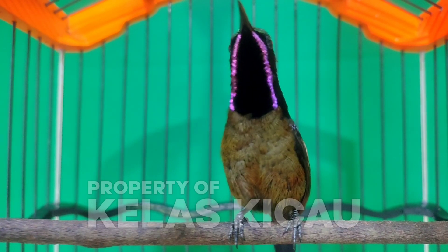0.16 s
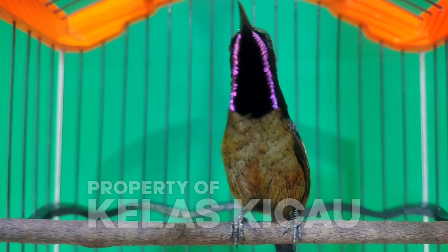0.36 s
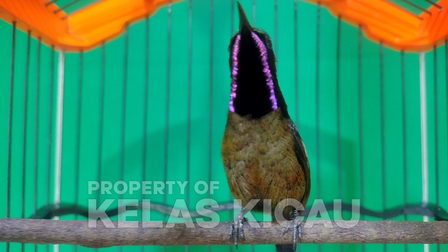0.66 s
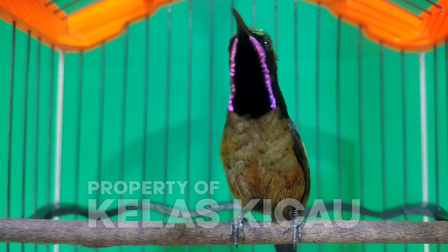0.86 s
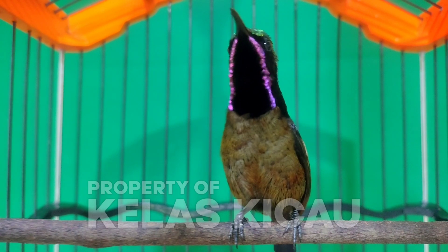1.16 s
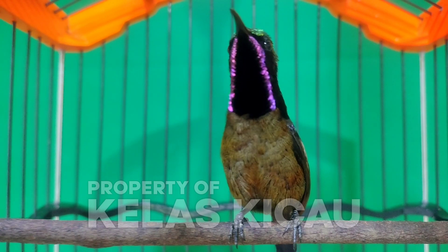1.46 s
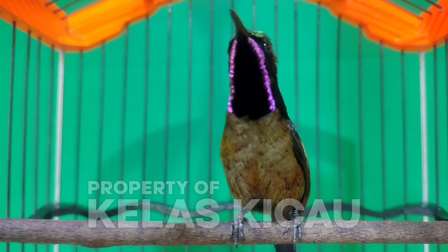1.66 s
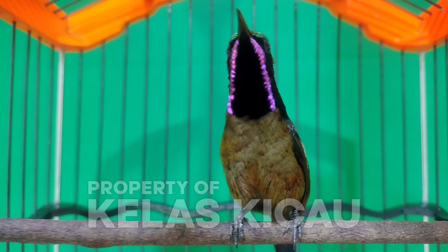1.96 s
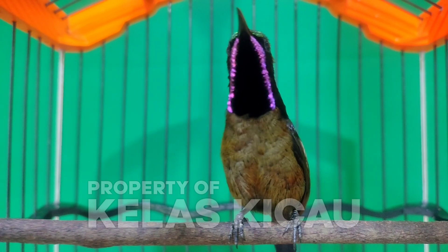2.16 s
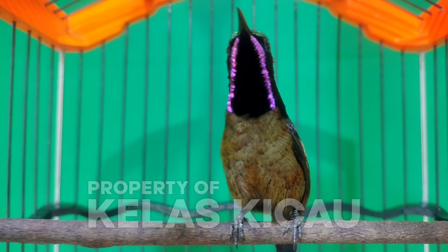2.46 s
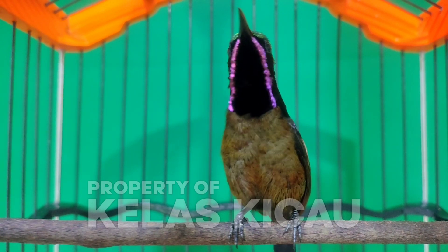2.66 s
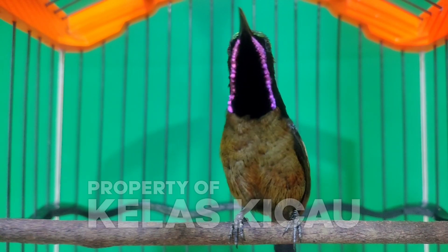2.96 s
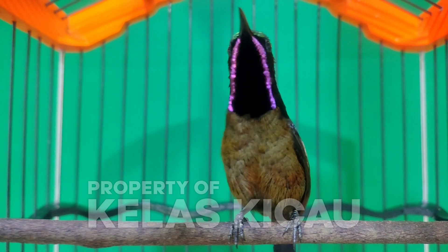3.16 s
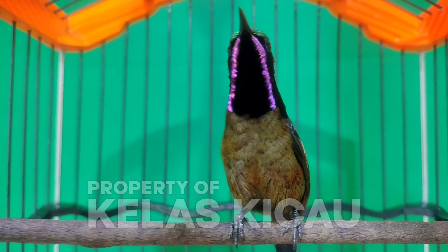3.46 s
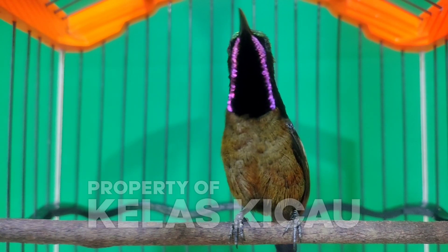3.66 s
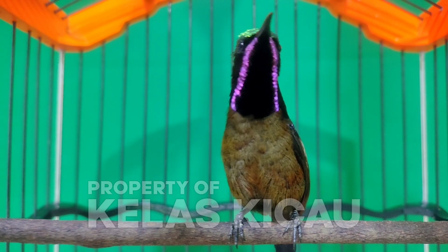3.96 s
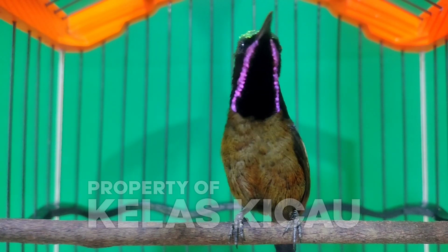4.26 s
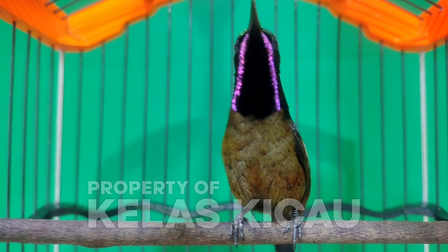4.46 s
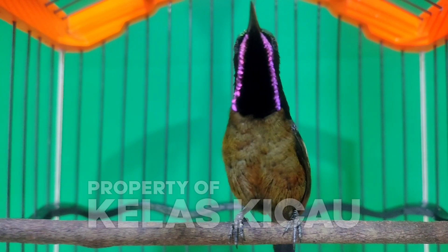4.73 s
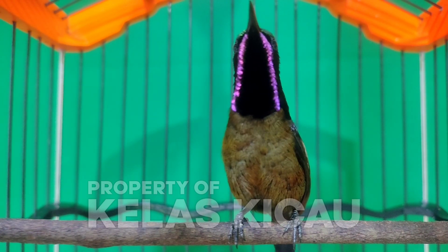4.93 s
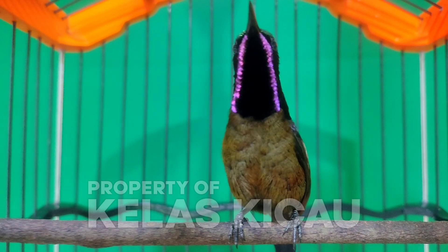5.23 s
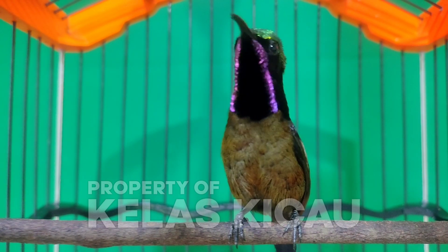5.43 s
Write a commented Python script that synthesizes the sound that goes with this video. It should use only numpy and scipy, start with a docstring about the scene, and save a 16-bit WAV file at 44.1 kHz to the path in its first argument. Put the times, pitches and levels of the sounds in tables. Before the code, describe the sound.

A small bird sings close to the microphone in a small, hard room. Quick fluttering chirps come first, then four harsh buzzy rasps and a few quieter rising double-toned slurs. After a pause of about a second, five loud, needle-sharp peeps ring out, ending in tiny dry chips. Short echoes follow the notes, and a faint low engine hum drifts behind them and fades.

```python
"""A caged sunbird sings close to the microphone in a small hard room: five fluttering notes, four harsh
rasps, four two-voiced slurs, five piercing peeps and three dry chips. Each note is a pitch contour driving
a few harmonics, roughened by jitter, beating and hiss, with echoes and a short tail from the room.
Faint puffs of noise come between the notes. Outside, a small engine slows, picks up speed and fades: low
harmonics and a dull rumble through the walls. Behind it lie faint air noise and a few faint far tones."""
import sys
import numpy as np
from scipy import signal
from scipy.fft import rfft, irfft
from scipy.io import wavfile
from scipy.ndimage import uniform_filter1d

SR = 44100
rng = np.random.default_rng(int(sys.argv[2]) if len(sys.argv) > 2 else 0)


def int16_out(signal):
    """Quantize to a 16-bit WAV file."""
    q = np.round(np.clip(np.atleast_2d(signal).T, -1, 1) * 32767)
    wavfile.write(sys.argv[1], SR, q.astype(np.int16))


N = 246519
TIME = np.arange(N) / SR
BINS = np.fft.rfftfreq(N, 1 / SR)


def bird():
    """The whole song: each kind of note has its own harmonics, roughness and hiss in the syrinx."""
    # Fluttering arches, two of them with a second hump. Each row: start, rise and fall in seconds,
    # first, top and last pitch in Hz, level in dB.
    warble_rows = [(0.066, .036, .031, 5010, 6007, 3870, -17), (.309, 0.03, .021, 3975, 4820, 4290, -23.5),
                   (.350, 0.011, 0.023, 4320, 4475, 4000, -24), (0.883, .046, .025, 5060, 5770, 4160, -16),
                   (1.010, .016, .071, 4360, 4893, 3783, -22),
                   (1.261, .015, 0.046, 4050, 4256, 3020, -26.5),
                   (1.308, 0.022, 0.025, 3125, 3754, 3645, -24)]
    # Harsh arches. Each row: start, rise and fall in seconds, top pitch in Hz, level in dB.
    rasp_rows = [(1.691, 0.042, .025, 3205, -15.5), (1.837, 0.045, .028, 3254, -15),
                 (1.987, .048, .028, 3175, -17.5), (2.151, .045, .028, 3414, -15)]
    # High notes from one side of the syrinx. Each row: start, rise and fall in seconds,
    # first, top and last pitch in Hz, level in dB.
    held_rows = [(2.726, .020, 0.026, 4120, 4546, 4500, -25), (2.754, 0.0074, 0.025, 4550, 5090, 4470, -25),
                 (2.889, .022, 0.022, 4100, 4632, 4414, -30),
                 (3.102, 0.033, 0.015, 4400, 4833, 4684, -29.5),
                 (3.257, .015, 0.014, 3530, 4492, 4065, -32)]
    # Slurs that the other side slides up under them. Each row: start and length in seconds,
    # first and last pitch in Hz, level in dB.
    slur_rows = [(2.765, 0.051, 3230, 4417, -24), (2.916, 0.071, 3020, 4534, -23),
                 (3.124, .045, 3150, 4888, -20.5), (3.258, .047, 3230, 3970, -25.5)]
    # Piercing arches. Each row: start, rise and fall in seconds, first, top and last pitch in Hz, level in dB.
    peep_rows = [(4.405, 0.012, .024, 2994, 7980, 5260, -7), (4.652, .016, 0.017, 3680, 8070, 5740, -10.5),
                 (4.812, .028, 0.0085, 4700, 8795, 6820, -6.5), (4.98, .012, 0.012, 7000, 9084, 7610, -12),
                 (5.156, .012, .020, 4265, 7920, 4750, -9)]
    # Dry steep sweeps. Each row: start and length in seconds, first and last pitch in Hz, level in dB.
    chip_rows = [(5.255, 0.026, 1865, 3040, -31.5), (5.392, 0.02, 3618, 1430, -24),
                 (5.475, .022, 3625, 1569, -23)]
    # Tiny pips that lead into a slur or a chip. Each row: start and length in seconds,
    # first and last pitch in Hz, level in dB.
    pip_rows = [(3.086, .016, 2940, 3326, -46.5), (3.246, .014, 1372, 2950, -49),
                (5.376, 0.0062, 3100, 3390, -41), (5.466, .009, 3050, 3240, -38)]
    # Relative strength of harmonics 1, 2, 3.. in fluttering notes, in dB.
    warble_tone = [0, -17, -17.5]
    # The same for rasps, heard mostly at twice their pitch, in dB.
    rasp_tone = [-16.5, 1.5, -5, -12, -11]
    # The same for held notes, slurs and pips, in dB.
    whistle_tone = [0, -15, -16.5]
    # The same for peeps, in dB.
    peep_tone = [0, -16.5]
    # The same for chips, rich in overtones, in dB.
    chip_tone = [-6.5, 0.5, -1.5, -29, -10.5]

    warbles = [warble(*row) for row in warble_rows]
    song = syrinx(warbles, warble_tone, jitter=0.0059, shimmer=0.08, hiss_db=-24.0,
                  flutter_depth_hz=457, beat=0.065, settle=0.067)
    rasps = [rasp(*row) for row in rasp_rows]
    song += syrinx(rasps, rasp_tone, jitter=0.018, shimmer=0.15, hiss_db=-14, beat=0.36)
    two_voices = [held(*row) for row in held_rows] + [slur(*row) for row in slur_rows]
    song += syrinx(two_voices, whistle_tone, jitter=.025, shimmer=.12, hiss_db=-13, beat=.6, settle=.03)
    peeps = [peep(*row) for row in peep_rows]
    song += syrinx(peeps, peep_tone, jitter=.004, shimmer=0.046, hiss_db=-43.0, settle=0.034)
    chips = [chip(*row) for row in chip_rows]
    song += syrinx(chips, chip_tone, jitter=0.036, shimmer=0.283, hiss_db=-3, beat=0.097)
    pips = [pip(*row) for row in pip_rows]
    song += syrinx(pips, whistle_tone, jitter=0.0087, shimmer=.1, hiss_db=-8.5)
    return song + hoarse_attacks()


def syrinx(notes, tone, jitter, shimmer, hiss_db, flutter_depth_hz=0, beat=0, settle=np.inf):
    """A membrane glides along each contour; its roughness and flutter fade over about settle seconds."""
    flutter_hz, beat_hz = 112, 627
    out = np.zeros(N)
    shake = wander(550)
    pant = np.tanh(wander(760))
    noise = amp(hiss_db) * hiss()
    # the other membrane beats against the first, pulling its pitch and strength
    lag = 2 * np.pi * np.cumsum(beat_hz * (1 + .25 * wander(120))) / SR
    for note in notes:
        at = np.arange(int((note[0][0] - .002) * SR), int((note[-1][0] + .002) * SR))
        t = at / SR
        rough = np.exp(-(t - t[0]) / settle)
        hz, db = (uniform_filter1d(c, size=90) for c in follow(note, t))
        flutter = flutter_depth_hz * rough * np.sin(2 * np.pi * flutter_hz * (t - t[0]))
        hz = hz * (1 + jitter * rough * shake[at]) + flutter
        phase = 2 * np.pi * np.cumsum(hz) / SR + beat * rough * np.sin(lag[at])
        # harmonics past the top of the digital band are left silent
        voice = unit(sum(amp(d) * np.sin(k * phase) * (k * hz < SR / 2) for k, d in enumerate(tone, 1)))
        strength = unit(1 + shimmer * pant[at] - .5 * beat * rough * np.cos(lag[at]))
        sound = strength * voice + rough * noise[at]
        out[at] += amp(db) * sound * signal.windows.tukey(len(at), .08)
    return out


def warble(start, rise, fall, first_hz, top_hz, last_hz, level_db):
    """A soft arch whose strength follows its pitch, loudest towards the top."""
    sag_db_per_khz = 4
    t, hz = arch(start, rise, fall, first_hz, top_hz, last_hz, rise_bend=1.4, fall_bend=1.5)
    under_khz = (top_hz - hz) / 1000
    shape = envelope(t, attack=.008, release=.013, edge_db=-14, swell_db=5.5)
    return np.c_[t, hz, level_db - sag_db_per_khz * under_khz + shape]


def rasp(start, rise, fall, top_hz, level_db):
    """A quick scoop up to a shoulder, then an arch that is pressed harder towards its end."""
    first_hz, last_hz = 2650, 2363  # ends of the arch, before the scoop
    scoop_hz, scoop_s = 1096, 0.0056
    t, hz = arch(start, rise, fall, first_hz, top_hz, last_hz, rise_bend=1.2, fall_bend=1.4)
    hz = hz - scoop_hz * np.exp(-(t - start) / scoop_s)
    return np.c_[t, hz, level_db + envelope(t, attack=.014, release=.012, edge_db=-19, swell_db=7)]


def held(*row):
    """A shallow arch on the high side of the syrinx."""
    *contour, level_db = row
    t, hz = arch(*contour, rise_bend=2.1, fall_bend=1.4)
    return np.c_[t, hz, level_db + envelope(t, attack=.008, release=.009, edge_db=-13, swell_db=1.5)]


def slur(start, length, first_hz, last_hz, level_db, bend=1.15):
    """An upward slide that swells as it climbs."""
    t = np.arange(start, start + length, 1 / SR)
    hz = last_hz + (first_hz - last_hz) * np.linspace(1, 0, len(t)) ** bend
    return np.c_[t, hz, level_db + envelope(t, attack=.014, release=.014, edge_db=-20, swell_db=9)]


def peep(*row):
    """A pointed arch, fainter the further it lies under the throat's resonance."""
    throat_hz, off_tune_db_per_khz = 7997, 8.5
    *contour, level_db = row
    t, hz = arch(*contour, rise_bend=1.3, fall_bend=1.2)
    under_khz = np.maximum(throat_hz - hz, 0) / 1000
    shape = envelope(t, attack=.005, release=.005, edge_db=-14, swell_db=-1.5)
    return np.c_[t, hz, level_db - off_tune_db_per_khz * under_khz + shape]


def chip(start, length, first_hz, last_hz, level_db):
    """An S-shaped sweep, steepest halfway and faint at both ends."""
    t = np.arange(start, start + length, 1 / SR)
    hz = last_hz + (first_hz - last_hz) * np.cos(np.linspace(0, np.pi / 2, len(t))) ** 2
    return np.c_[t, hz, level_db + envelope(t, attack=.009, release=.012, edge_db=-16, swell_db=1.5)]


def pip(start, length, first_hz, last_hz, level_db):
    """A short straight glide."""
    return [(start, first_hz, level_db), (start + length, last_hz, level_db)]


def arch(start, rise, fall, first_hz, top_hz, last_hz, rise_bend, fall_bend):
    """Pitch climbs to a top and drops again; a bend of 1 is pointed, 2 is round."""
    t = np.arange(-rise, fall, 1 / SR)
    climb = (first_hz - top_hz) * np.maximum(-t / rise, 0) ** rise_bend
    drop = (last_hz - top_hz) * np.maximum(t / fall, 0) ** fall_bend
    return start + rise + t, top_hz + climb + drop


def envelope(t, attack, release, edge_db, swell_db):
    """Level in dB: a quick attack, a steady swell all along, a release."""
    shut = np.maximum(1 - np.minimum((t - t[0]) / attack, (t[-1] - t) / release), 0)
    return edge_db * shut + swell_db * np.linspace(-.5, .5, len(t))


def hoarse_attacks():
    """The syrinx hisses before it finds a pitch."""
    # Each row: start and length in seconds, level halfway in dB, swell from start to end in dB.
    attack_rows = [(0.05, 0.024, -46, 13.5), (0.861, 0.018, -47.5, 19), (1.26, 0.018, -44, 13),
                   (3.074, 0.083, -43.5, 2), (3.234, 0.024, -45, 11.5), (4.401, 0.0093, -34.5, 2.5),
                   (4.641, 0.026, -37, 9), (5.146, 0.014, -34.5, -5.5), (5.228, 0.054, -36, 16.5),
                   (5.375, 0.039, -39.5, 1), (5.465, 0.036, -38, 3)]
    strength = np.zeros(N)
    for s, length, db, swell in attack_rows:
        ramp = np.clip((TIME - s) / length - .5, -.5, .5)
        strength += amp(db + swell * ramp) * gate(s, length, 0.0014)
    return strength * hiss()


def hiss():
    """Turbulence coloured by the throat and beak."""
    # Each row: frequency in Hz, relative level in dB.
    throat_colour = [(300, -36), (1000, -21), (2000, -11.5), (3200, -2), (4500, -8), (6000, -1),
                     (8200, 2.5), (11000, -9.5), (15000, -19)]
    return unit(uneven(colour(rng.standard_normal(N), throat_colour), uneven_db=6))


def room(x, wet_db):
    """A few near echoes, then a diffuse tail that rings longest near 2 kHz and shortest near 8 kHz."""
    # Echoes off the cage and the wall behind it. Each row: delay in milliseconds, level in dB.
    echo_rows = [(1.4, -22.5), (2.9, -12.5), (5.6, -25.5), (9.4, -14)]
    # Each row: frequency in Hz, time to decay by 60 dB in seconds.
    decay_times = [(500, 0.32), (2000, 0.54), (4500, 0.35), (8000, 0.28), (14000, 0.41)]
    taps = rng.standard_normal(SR) * np.clip((TIME[:SR] - .004) / 0.011, 0, 1)
    hz, t, z = signal.stft(taps, SR, nperseg=256)
    fade = amp(-60 * t / read(decay_times, hz)[:, None])
    tail = signal.istft(z * fade, SR, nperseg=256)[1]
    near = sum(amp(db) * np.interp(TIME - ms / 1000, TIME, x, left=0) for ms, db in echo_rows)
    diffuse = signal.fftconvolve(x, tail / np.linalg.norm(tail))[:N]
    return x + near + amp(wet_db) * uneven(diffuse, uneven_db=7)


def overload(level_db):
    """The loudest peep overloads the microphone: a brief low-heavy burst of noise."""
    burst_colour = [(30, -23.5), (80, 3.0), (400, -10), (1000, -23), (3000, -22), (8000, -34)]  # Hz, dB
    low = colour(rng.standard_normal(N), burst_colour)
    return amp(level_db) * gate(4.827, 0.024, 0.0051) * unit(low)


def noise_puffs(t60, skirt_db):
    """Faint puffs of decaying noise, each with a ragged colour of its own."""
    # Faint puffs of noise between the notes, the lower ones perhaps far calls.
    # Each row: start in seconds, level in dB, strongest band in Hz.
    puff_rows = [(0.504, -56.5, 8300), (0.675, -57.5, 3900), (0.714, -48, 1650), (2.47, -57.5, 1602),
                 (3.536, -60, 2030), (3.699, -64, 1580), (3.918, -53, 1497), (4.352, -60.5, 2000)]
    out = np.zeros(N)
    for s, db, hz in puff_rows + high_patches(count=8, spread_db=8.5):
        band = [(hz / 5, -40), (hz * 0.64, skirt_db), (hz, 0), (hz * 1.29, skirt_db), (12000, -36), (16000, -60)]
        ragged = unit(uneven(colour(rng.standard_normal(N), band), uneven_db=9))
        decay_db = -60 * np.maximum(TIME - s, 0) / t60
        out += amp(db + decay_db) * gate(s - .002, .4, 0.0023) * ragged
    return out


def high_patches(count, spread_db):
    """Faint high patches of noise, loosely spaced over the long pause, of random strength and colour."""
    start_s, end_s, middle_db, low_hz, high_hz = 3.5, 4.3, -62.5, 5250, 10030
    when, size, band = rng.random((count, 3)).T
    s = start_s + (end_s - start_s) * (np.arange(count) + when) / count
    return list(zip(s, middle_db + spread_db * (size - .5), low_hz + (high_hz - low_hz) * band))


def engine(hum_db=-5.5):
    """Five wavering harmonics of the firing cycle slide through the band the walls pass, over a dull rumble."""
    # Each row: time in seconds, firing cycles a second in Hz.
    speed = [(0, 24.7), (.3, 23.06), (.58, 20.56), (.84, 22.94), (1.15, 23.59), (1.8, 27.44), (2.3, 28.78),
             (2.9, 31.58), (3.7, 32.82), (5.59, 32.77)]
    # Which harmonics of the firing cycle are heard.
    harmonics = (2, 4, 5, 6, 7)
    # What the walls let in, with a small boom of the room near 57 Hz.
    # Each row: frequency in Hz, relative level in dB.
    hum_band = [(45, -24), (53, -21.5), (57.5, -7), (63, -17.5), (80, -14.5), (92, 1.5), (116, -5),
                (138, -1), (166, 0), (198, -16.5), (235, -24.5)]
    # Course of the hum, to which hum_db is added. Each row: time in seconds, relative level in dB.
    hum_level = [(0.0, -52), (0.22, -42.5), (0.42, -46), (1.16, -42.5), (1.31, -52), (1.93, -39),
                 (2.43, -50.5), (2.58, -45.5), (4.14, -43.5), (4.52, -61), (4.75, -65), (4.92, -58.5),
                 (5.286, -55), (5.318, -62), (5.59, -69)]
    # Dull rumble through the walls. Each row: frequency in Hz, relative level in dB.
    wall_colour = [(25, -9), (42, -13.5), (60, -5), (75, -4.5), (100, 4.5), (160, -4), (205, -8), (240, -6),
                   (310, -18), (450, -31), (900, -59), (5000, -85.5)]
    # Loudness of the rumble. Each row: time in seconds, level in dB.
    rumble_level = [(0, -55), (.9, -53.5), (1.5, -54.5), (2.1, -50), (2.8, -52.5), (3.6, -56.5),
                    (4.1, -56.5), (4.55, -63), (5.2, -53.5), (5.59, -73)]
    hz = follow(speed, TIME)[0]
    turns = np.cumsum(hz * (1 + 0.0043 * wander(5.2))) / SR
    hum = np.zeros(N)
    for k in harmonics:
        strength = amp(read(hum_band, k * hz) + 2.8 * wander(4))
        hum += strength * np.sqrt(2) * np.sin(2 * np.pi * (k * turns + rng.random()))
    rumble = unit(colour(rng.standard_normal(N), wall_colour))
    return amp(hum_db + follow(hum_level, TIME)[0]) * hum + amp(follow(rumble_level, TIME)[0]) * rumble


def air():
    """Faint patchy outdoor noise with a few far tones that waver in pitch and strength."""
    # Each row: frequency in Hz, relative level in dB.
    air_colour = [(100, -26), (300, -14.5), (440, -1), (580, -6), (730, -0.5), (900, -7.5), (1200, -7.5),
                  (1600, -1), (2200, -2), (3000, -11), (4500, -30.5), (9000, -20.5), (12000, -59.5)]
    # Loudness of the noise. Each row: time in seconds, level in dB.
    air_level = [(0, -58.5), (.8, -63), (1.6, -58), (2.1, -50), (2.6, -61), (3.3, -69.5), (3.9, -62),
                 (4.25, -75), (4.45, -56), (4.6, -68), (5.59, -62.5)]
    # Faint far tones: two low hoots, a pip and a longer thin whine.
    # Each row: start and length in seconds, pitch in Hz, mean level in dB.
    far_tone_rows = [(1.235, .035, 1850, -56), (3.34, .1, 445, -58), (3.55, .6, 745, -66),
                     (5.03, .22, 435, -60)]
    far_tones = np.zeros(N)
    for s, length, hz, db in far_tone_rows:
        tone = np.sin(2 * np.pi * np.cumsum(hz * (1 + .025 * wander(90))) / SR)
        far_tones += amp(db + 4 * wander(25)) * gate(s, length, .02) * tone
    return amp(follow(air_level, TIME)[0]) * patchy(air_colour, patchy_db=10.5) + far_tones


def patchy(spectrum, patchy_db):
    """Noise whose bands come and go in patches."""
    hz, t, z = signal.stft(rng.standard_normal(N), SR, nperseg=1024, noverlap=768)
    across_bands = uniform_filter1d(rng.standard_normal(z.shape), size=6, axis=0)
    patches = unit(uniform_filter1d(across_bands, size=14, axis=1))
    z = z * amp(read(spectrum, hz)[:, None] + patchy_db * np.minimum(patches, 2))
    return unit(signal.istft(z, SR, nperseg=1024, noverlap=768)[1][:N])


def uneven(x, uneven_db):
    """Random peaks and dips in the spectrum, such as many short paths between bars and walls cut."""
    hz = np.arange(0, SR / 2, 170)
    return colour(x, np.transpose([hz, uneven_db * np.tanh(rng.standard_normal(len(hz)))]))


def wander(hz):
    """Random motion of rms 1, no faster than about hz."""
    return unit(irfft(rfft(rng.standard_normal(N)) / (1 + (BINS / hz) ** 4), N))


def gate(start, length, edge):
    """Opens softly for a while and shuts again."""
    return np.clip(np.minimum(TIME - start, start + length - TIME) / edge, 0, 1)


def colour(x, points):
    """Filters by a spectrum in dB."""
    return irfft(rfft(x) * amp(read(points, BINS)), N)


def read(points, hz):
    """Reads a spectrum on a log-frequency axis."""
    f, value = np.transpose(points)
    return np.interp(np.log(hz + 1), np.log(f + 1), value)


def follow(rows, t):
    """Reads each column of a curve at the times t."""
    s, *columns = np.transpose(rows)
    return [np.interp(t, s, c) for c in columns]


def amp(db):
    """Decibels to gain."""
    return 10 ** (np.asarray(db) / 20)


def unit(x):
    """Scales to rms 1."""
    return x / np.sqrt(np.mean(x ** 2) + 1e-20)


def scene():
    """The bird in its room, the microphone's overload and faint puffs of noise, over the sounds from outside."""
    near = room(bird(), wet_db=-15.5) + overload(level_db=-38.0)
    return (near + noise_puffs(t60=0.36, skirt_db=-21.0) + engine() + air())[None]


def record(dry):
    """The microphone's uneven treble, then a steep band limit."""
    # Response of the microphone. Each row: frequency in Hz, gain in dB.
    response = [(20, 0.5), (9100, 0), (9900, -13), (10600, -3.5), (11400, -5), (12300, -23), (13200, -14),
                (14200, -16.5), (15400, -14.5), (16000, -20)]
    edge_hz = 15700
    heard = colour(dry[0], response)
    low_pass = signal.firwin(511, edge_hz, window=("kaiser", 9), fs=SR)
    return signal.oaconvolve(heard, low_pass, "same")[None]


dry = scene()
out = record(dry)
int16_out(out)
```